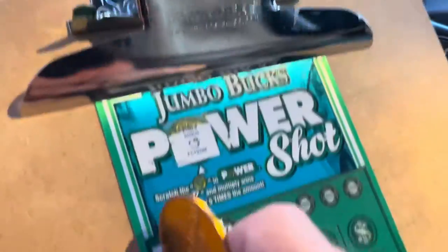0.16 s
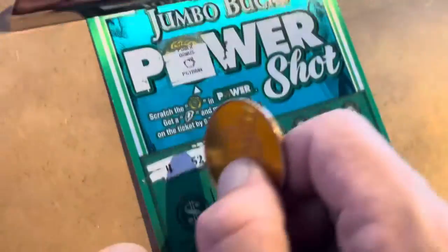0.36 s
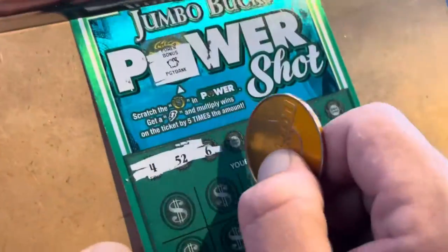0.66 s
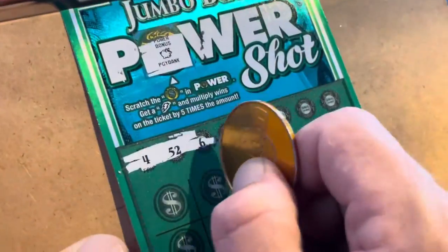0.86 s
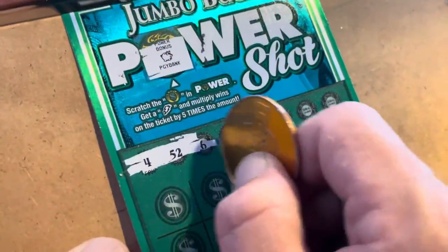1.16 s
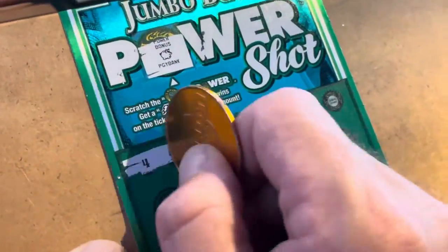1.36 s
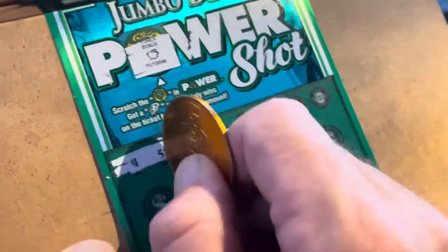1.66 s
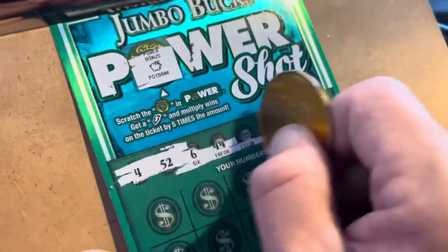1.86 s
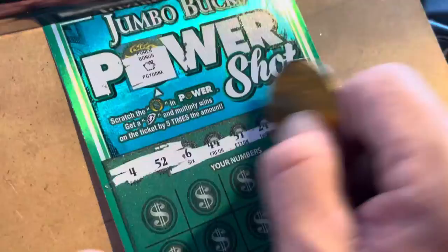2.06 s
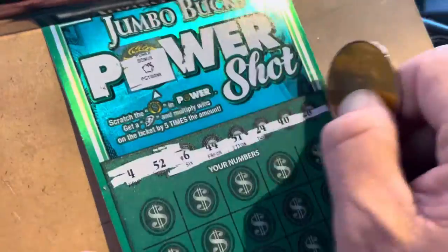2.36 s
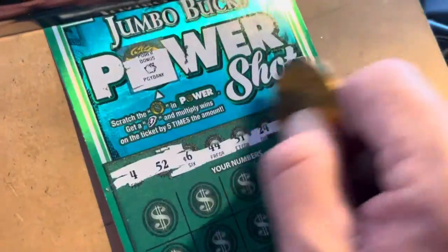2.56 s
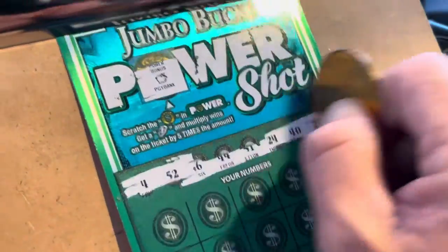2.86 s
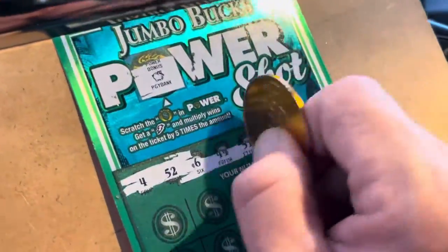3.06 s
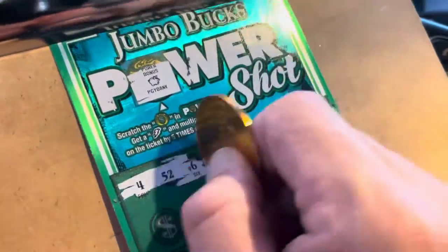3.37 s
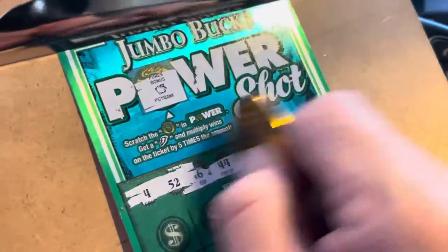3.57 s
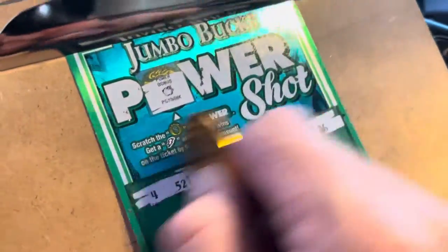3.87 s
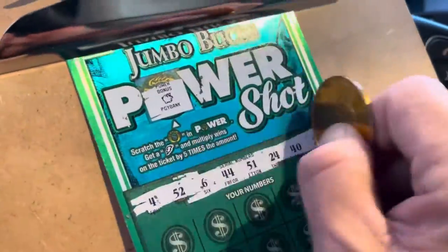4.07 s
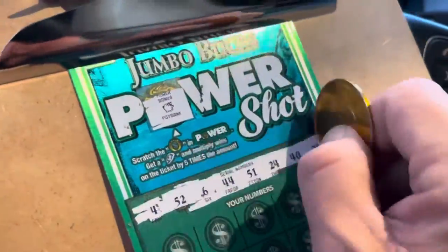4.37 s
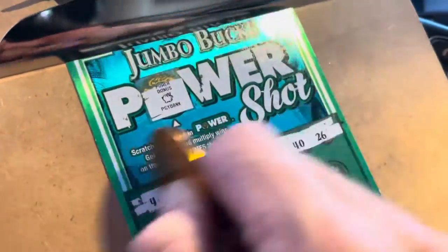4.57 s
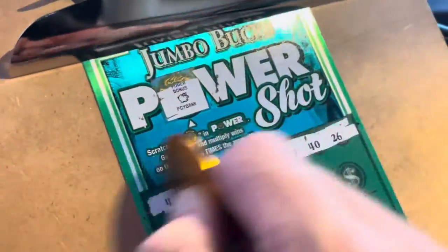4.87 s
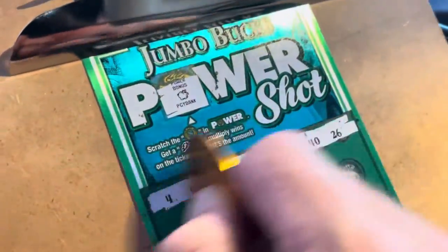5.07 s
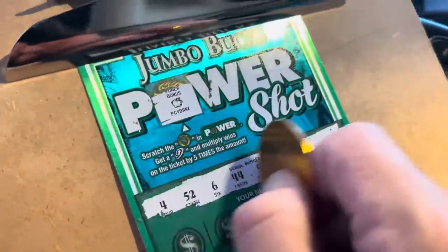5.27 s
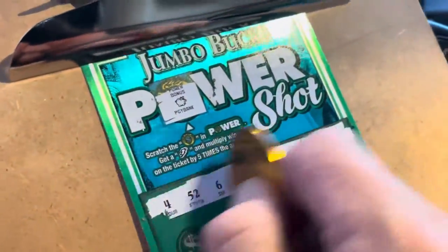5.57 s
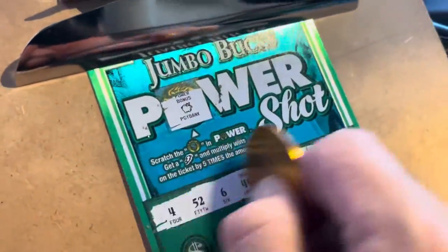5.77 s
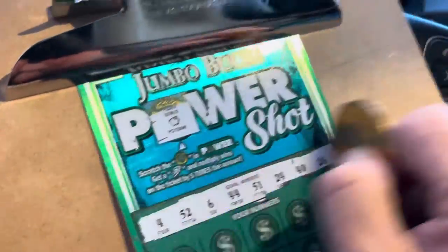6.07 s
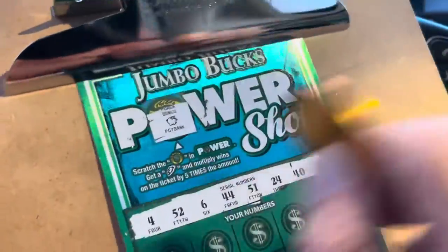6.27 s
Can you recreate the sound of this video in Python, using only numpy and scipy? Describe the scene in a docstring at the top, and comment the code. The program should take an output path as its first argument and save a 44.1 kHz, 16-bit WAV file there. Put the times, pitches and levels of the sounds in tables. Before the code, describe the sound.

Inside a parked, idling car, a low boomy rumble runs throughout. A hand rubs faintly on a clipboard with a few soft ticks, then from just over a second a coin scrapes a scratch card in quick alternating strokes, each a dry rasp with crisp tearing hiss. Occasional knocks ring the board. The scraping stops near the end with small taps. Close microphone, slight stereo width.

```python
"""Coin on a scratch card, parked car

Phone held close: a coin edge scrapes back and forth over a scratch card on a fibreboard clipboard.
Each stroke is a run of tiny catches that ring the board; where the edge bites, the coating tears with a hiss.
The coin knocks on ridges as short blows to the board's modes; the hand rustles as faint noise before and after.
Behind it the idling car booms in the cabin: steady low tones over coloured rumble."""
import sys
import numpy as np
from scipy import signal
from scipy.fft import rfft, irfft
from scipy.io import wavfile
from scipy.ndimage import uniform_filter1d

SR = 44100
rng = np.random.default_rng(int(sys.argv[2]) if len(sys.argv) > 2 else 0)


def persist_wave(psi):
    """Save psi, clipped to +-1, as 16-bit WAV."""
    counts = np.round(np.clip(psi, -1, 1) * 32767).astype(np.int16)
    wavfile.write(sys.argv[1], SR, np.atleast_2d(counts).T)


N = 283122
T = np.arange(N) / SR

# Cabin rumble spectrum: pitch_hz [Hz], density_db [dB per Hz, relative]
CABIN_SPECTRUM = [(30, -16.5), (45, -6), (75, -8), (112, -1), (130, -5), (160, -14.5), (260, -20),
                  (350, -27), (440, -22), (830, -43), (3100, -54), (4800, -73.5)]
CABIN_DB = -34  # rms of the rumble before its one swell, without the side part
# Cabin width: pitch_hz [Hz], side_minus_mid_db [dB]
CABIN_WIDTH = [(60, -13), (130, -18), (380, -4), (1300, -3), (2400, -14), (4400, -25)]
# Idle firing tones: multiple [of IDLE_HZ], level_db [dB rms]
IDLE_TONES = [(1, -49), (2, -43.5), (4, -43)]
IDLE_HZ = 27.97
# The low rumble swells once: peak_s [s], half_width_s [s], swell_db [dB]
RUMBLE_SWELL = (0.38, 0.25, 9)
HUM_HZ, HUM_DB = 311.3, -52.5  # thin hum of steady pitch, left only

# The hand rubs the board: time_s [s], level_db [dB]
HAND_RUB = [(.045, -51.5), (.075, -45), (.12, -43), (.165, -54), (.27, -52.5), (.33, -67)]
# Skin and card rustle as the hand shifts: peak_s [s], level_db [dB], half_length_s [s],
# treble_db [dB over the rest]
HAND_SHIFTS = [(0.102, -67, 0.045, 8), (0.356, -68.5, 0.24, 3.2), (0.51, -60.5, 0.039, -29),
               (0.666, -69, 0.042, -3), (0.796, -71.5, 0.044, 7), (1.171, -56.5, 0.041, -13),
               (1.244, -70.5, 0.069, 11), (6.395, -53, 0.043, 3)]
SHIFT_FADE_DB, STILL_DB = 16, -77.5  # lost at the half length; the hand at rest
# The edge resting on the card at the turns: first_db, last_db [dB at the first stroke and at the lift]
RESTING_EDGE_DB = (-70, -63.5)

# Knocks on the board: time_s [s], board_db [dB, relative], thud_db [dB]
RIDGE_KNOCKS = [(0.186, -30.5, -53), (0.353, -50, -25), (1.903, -18, -27.5), (2.774, -25, -25),
                (3.281, -18.5, -21), (3.852, -15, -47.5), (4.137, -16, -36), (4.165, -33, -25),
                (6.0869, -5, -26), (6.158, -32, -28), (6.351, -31.5, -28.5), (6.391, -33.5, -50.5)]
# Light ticks of coin and card: time_s [s], level_db [dB, relative]
LIGHT_TICKS = [(0.143, -42), (0.183, -38), (0.815, -47.5), (.887, -54), (1.014, -55), (1.112, -54),
               (1.276, -38.5), (2.009, -34), (3.534, -33.5), (4.2758, -19), (4.295, -18), (6.157, -33),
               (6.349, -27)]
# Ringing modes of the clipboard: pitch_hz [Hz], width_hz [Hz], level_db [dB, relative]
BOARD_MODES = [(582, 120, -8), (750, 113, -2.5), (1098, 317, 1.5), (1255, 135, 0.5), (1396, 113, -6.5),
               (2234, 200, -11.5), (2770, 550, -17)]
# Low modes behind the thuds: pitch_hz [Hz], width_hz [Hz], level_db [dB, relative]
THUD_MODES = [(249.5, 77, 1), (330, 250, -2.5)]

# Strokes: start_s [s], board_db [dB], swell_db [dB over the stroke], grit_db [dB]
COIN_STROKES = [(1.375, -30.5, 18, -40.5), (1.544, -32, 2, -42.5), (1.682, -31.5, 14, -36.5),
                (1.851, -38.5, -17, -48), (1.989, -32.5, 18, -47.5), (2.162, -31, -1, -51.5),
                (2.277, -36, -5, -44), (2.42, -31.5, 4, -48.5), (2.542, -34.5, -2, -36.5),
                (2.664, -33, 27, -55), (2.795, -38, 2, -42), (2.939, -34, 17, -43),
                (3.075, -36.5, -16, -48), (3.207, -34, 1, -47.5), (3.357, -34, 1, -59),
                (3.514, -29, -0.5, -53), (3.65, -34.5, 0.5, -41), (3.786, -33, -2, -59.5),
                (3.936, -28.5, 8, -42), (4.083, -36, -16.5, -41.5), (4.241, -29, 3, -50.5),
                (4.386, -36.5, 6, -37), (4.555, -32.5, 2.5, -45.5), (4.712, -29, 4.5, -56.5),
                (4.851, -31.5, 2.5, -49), (4.997, -35, -8, -56), (5.132, -33.5, 4, -45),
                (5.264, -34.5, -5, -48), (5.41, -33.5, 9, -47), (5.545, -31, 2, -55),
                (5.673, -34.5, 8, -50.5), (5.825, -33, -9.5, -51), (5.948, -27, 14.5, -53.5)]
TURN_S, LIFT_S = 0.014, 6.15  # pause at each turn; the coin leaves the card
LOOSE_S, SLOWING_SHARE = 0.015, 0.49  # breaking loose; share of the stroke spent slowing
BOARD_POWER, GRIT_POWER = 1.8, 2.4  # how sharply board and grit fall as the coin slows
# Low board modes ring less as the coin works along: first_db, last_db [dB at the first stroke and the lift]
LOW_MODES_TREND_DB = (1.3, -2.5)

# The edge bites into the coating: start_s [s], length_s [s], peak_db [dB],
# swell_db [dB climbed from the catch to the peak]
EDGE_BITES = [(1.396, 0.1, -38.5, 22.5), (1.567, 0.066, -44.5, 14), (1.699, 0.092, -34.5, 10.5),
              (1.877, 0.037, -42, 6), (2.035, 0.079, -31.5, 1.5), (2.178, 0.068, -36.5, 11),
              (2.334, 0.032, -33, -2), (2.541, 0.085, -36.5, 9), (2.721, 0.057, -36.5, 18),
              (2.805, 0.082, -31, 17.5), (2.97, 0.071, -39, 14), (3.075, 0.017, -32.5, 16.5),
              (3.132, 0.04, -34, 10.5), (3.275, 0.035, -44, 10), (3.364, 0.07, -30, 15.5),
              (3.571, 0.04, -34, 13), (3.668, 0.057, -29, 5.5), (3.818, 0.064, -34.5, 12),
              (3.967, .011, -33, 1.5), (4.108, 0.059, -32.5, 2.5), (4.262, .085, -37, 14),
              (4.417, 0.048, -33.5, 3), (4.6, 0.029, -30.5, 11), (4.753, 0.078, -41.5, 10),
              (5.034, 0.071, -38.5, 12), (5.141, 0.051, -36, 5), (5.208, 0.039, -32.5, 1),
              (5.291, 0.024, -33, 1.5), (5.339, .04, -36.5, -1.5), (5.42, 0.046, -37, 14),
              (5.61, 0.037, -34.5, 17), (5.678, 0.022, -33, 7), (5.895, 0.025, -38, 8),
              (5.988, 0.11, -41, 13), (6.074, 0.056, -31.5, 6)]
CATCH_S, BITE_PEAK_SHARE = 0.00095, 0.6  # onset ramp; share of the length before the peak
BITE_FADE_DB, BITE_FADE_POWER = 12.5, 2.13  # lost from the peak to the end of the length; curve
# Fresh coating tears bright, the bared card duller: time_s [s], treble_db [dB over the tearing hiss]
COATING_TREBLE = [(1.4, 3), (1.75, 4), (3.7, 1), (4.5, -1), (6.1, -6)]
# The finest flakes fly first: band edge, lift at the catch, extra loss over one bite length
FIZZ_HZ, FIZZ_DB, FIZZ_FADE_DB = 8400, 4, 6.5
# Tearing hiss, coarse flakes: pitch_hz [Hz], density_db [dB per Hz, relative]
TEAR_SPECTRUM = [(600, -28.5), (1000, 4), (1800, -5.5), (2500, 2), (3700, -2), (5200, -23)]
# Treble of the tearing, fine flakes: pitch_hz [Hz], density_db [dB per Hz, relative]
AIR_SPECTRUM = [(3000, -20), (4600, 0), (5500, -2), (9200, -8), (11000, -13), (12300, -15), (13600, -11),
                (15600, -9)]

# Part of the near sounds opposite in left and right: pitch_hz [Hz], level_db [dB]
NEAR_WIDTH = [(300, -18), (1250, -14), (1750, -3.5), (2300, -18), (4000, -74)]
# Stereo phase of the treble: pitch_hz [Hz], left_minus_right_phase_rad [rad]
STEREO_PHASE = [(5700, 0), (6900, -1), (7850, -np.pi), (8700, -np.pi), (10800, -2 * np.pi),
                (12200, -2 * np.pi), (14200, -3 * np.pi)]
# Balance of the near sounds: pitch_hz [Hz], left_minus_right_db [dB]
NEAR_BALANCE = [(100, -0.5), (600, 2), (1500, 0.5)]
TOP_HZ = 15900
LEFT_RIGHT = np.array([[1], [-1]])  # signs of a difference between left and right


def undb(db):
    """Decibels to amplitude."""
    return 10 ** (np.asarray(db) / 20)


def unit(x):
    """Scales to an rms of 1."""
    return x / np.sqrt(np.mean(x ** 2))


def over_time(table):
    """A (time, value) table at every sample."""
    return np.interp(T, *np.transpose(table))


def over_hz(table, size, ends=None):
    """A (Hz, value) table on the bins of a transform, interpolated over log frequency."""
    hz, value = np.transpose(table)
    bins = np.arange(size // 2 + 1) * SR / size
    return np.interp(np.log(bins + 1), np.log(hz + 1), value, left=ends)


def colour(x, table):
    """Causal minimum-phase filter with the given spectrum, from the folded cepstrum."""
    size = 8192
    ceps = irfft(np.log(undb(over_hz(table, size, ends=-60))))
    ceps[1:size // 2] *= 2
    ceps[size // 2 + 1:] = 0
    return signal.fftconvolve(x, irfft(np.exp(rfft(ceps))))[:N]


def ring(x, modes, sign=-1, first=0, count=None):
    """Damped modes struck by x; each next mode starts scaled by sign (-1: neighbours swing opposite)."""
    t = T[:SR // 10]
    each = []
    for k, (hz, width, db) in enumerate(modes):
        decay = np.exp(-np.pi * width * t)
        each.append(sign ** k * undb(db) * np.sqrt(width) * decay * np.sin(2 * np.pi * hz * t))
    peak = np.abs(sum(each)).max()  # of all modes, whichever are played
    return signal.fftconvolve(x, sum(each[first:count]) / peak)[:N]


def grains(per_s, spread_db):
    """Random catches, a few much stronger than the rest."""
    hit = rng.random(N) < per_s / SR
    boost_db = spread_db * np.minimum(rng.exponential(size=N), 4.5)
    return hit * rng.standard_normal(N) * undb(boost_db)


def walk(rate):
    """Random levels held 1 / rate s and slewed; rms 1."""
    hold = int(SR / rate)
    steps = np.repeat(rng.standard_normal(N // hold + 1), hold)
    return unit(uniform_filter1d(steps, hold)[:N])


def scatter(x, t60_s, wet_db):
    """Adds many small modes of card and clip as decaying noise; the set drifts with the contact. Keeps the rms."""
    t = T[:SR // 16]
    share = np.abs([walk(12) for _ in range(12)]) ** 2 + 0.024
    share /= np.sqrt(np.sum(share ** 2, axis=0))
    wet = 0
    for weight in share:
        tail = rng.standard_normal(len(t)) * 1000 ** (-t / t60_s)
        wet = wet + signal.oaconvolve(x * weight, tail)[:N]
    return unit(unit(x) + undb(wet_db) * unit(wet)) * np.sqrt(np.mean(x ** 2))


def cabin():
    """Idle firing tones and a thin hum over rumble in the cabin's resonances, in stereo."""
    boom = colour(rng.standard_normal(N), CABIN_SPECTRUM)
    other = colour(rng.standard_normal(N), CABIN_SPECTRUM)
    side = irfft(rfft(other) * undb(over_hz(CABIN_WIDTH, N)), N)
    gain = undb(CABIN_DB) / np.sqrt(np.mean(boom ** 2))

    peak_s, half_width_s, swell_db = RUMBLE_SWELL
    low = signal.sosfilt(signal.butter(2, 95, fs=SR, output="sos"), boom)
    swell = undb(swell_db * np.exp(-((T - peak_s) / half_width_s) ** 2))
    boom = boom + low * (swell - 1)

    idle = 0
    for k, db in IDLE_TONES:
        level = np.sqrt(2) * undb(db + 0.58 * (k - 1) * walk(3.14))  # higher multiples waver more
        idle = idle + level * np.sin(2 * np.pi * (k * IDLE_HZ * T + rng.random()))
    hum = np.sqrt(2) * undb(HUM_DB + 2.9 * walk(2.9)) * np.sin(2 * np.pi * HUM_HZ * T)
    left_only = np.array([[1], [0]])
    return hum * left_only + idle + gain * (boom + side * LEFT_RIGHT)


def rustle():
    """Gains of the hand's friction on the board, of faint skin-and-card rustle and of its treble."""
    rub = undb(np.interp(T, *np.transpose(HAND_RUB), right=-120))
    first = COIN_STROKES[0][0]
    on_card = (T > first) * (T < LIFT_S)
    rest = undb(STILL_DB) + on_card * undb(np.interp(T, (first, LIFT_S), RESTING_EDGE_DB))
    shifts = np.array([undb(db - SHIFT_FADE_DB * ((T - peak_s) / half_s) ** 2)
                       for peak_s, db, half_s, _ in HAND_SHIFTS])
    treble = undb([row[-1] for row in HAND_SHIFTS])
    return rub, rest + shifts.sum(axis=0), rest + treble @ shifts


def knocks():
    """Each blow starts board and thud modes together; ticks are short cracks of decaying noise."""
    board, thud, tick = np.zeros((3, N))
    for s, db, thud_db in RIDGE_KNOCKS:
        i = int(s * SR)
        board[i], thud[i] = undb(db), undb(thud_db)
    for s, db in LIGHT_TICKS:
        tick[int(s * SR)] = undb(db)
    t = T[:SR // 20]
    crack = signal.fftconvolve(tick, rng.standard_normal(len(t)) * np.exp(-t / 0.0076))[:N]
    highs = undb(7.0) * ring(board, BOARD_MODES, sign=0.93, first=2)
    lows = undb(-8.0) * ring(board, BOARD_MODES, sign=1, count=2)
    struck = scatter(highs + lows, t60_s=0.077, wet_db=-0.5)
    ticks = undb(-4.5) * colour(crack, TEAR_SPECTRUM) + colour(crack, AIR_SPECTRUM)
    return struck + ring(thud, THUD_MODES) + ticks


def strokes():
    """Board and grit gains: the coin breaks loose quickly, crosses and slows to the turn."""
    board, grit = np.zeros(N), np.zeros(N)
    ends = [row[0] - TURN_S for row in COIN_STROKES[1:]] + [LIFT_S]
    for (start, db, swell_db, grit_db), end in zip(COIN_STROKES, ends):
        done = np.clip((T - start) / (end - start), 0, 1)
        loose = 1 - np.exp(-np.maximum(T - start, 0) / LOOSE_S)
        slowing = np.sin(np.pi / 2 * np.minimum((1 - done) / SLOWING_SHARE, 1))
        board += undb(db + swell_db * (done - .5)) * loose * slowing ** BOARD_POWER
        grit += undb(grit_db) * loose * slowing ** GRIT_POWER
    return board, grit


def bites():
    """Gains of the tearing hiss, of its treble and of the fizz on top: a sudden catch, a swell, a fade."""
    tear, fizz = np.zeros((2, N))
    for start, length, db, swell_db in EDGE_BITES:
        span = slice(int(start * SR), int((start + 3 * length) * SR))  # leaves room for the fade
        done = (T[span] - start) / length
        past_peak = done - BITE_PEAK_SHARE
        catch = np.clip(done * length / CATCH_S, 0, 1)
        climb_db = -swell_db * past_peak / BITE_PEAK_SHARE
        fade_db = BITE_FADE_DB * (np.abs(past_peak) / (1 - BITE_PEAK_SHARE)) ** BITE_FADE_POWER
        level_db = db - np.where(past_peak < 0, climb_db, fade_db)
        tear[span] += catch * undb(level_db)
        fizz[span] += catch * undb(level_db + FIZZ_DB - FIZZ_FADE_DB * done)
    treble = undb(over_time(COATING_TREBLE))
    return tear, tear * treble, fizz * treble


def scrape(board, tear, air, fizz):
    """Catches ring the board; torn coating crackles densely, in coarse and in fine flakes."""
    catches = grains(3000., 1.76)
    # low and high modes come and go with the place of contact
    trend_db = np.interp(T, (COIN_STROKES[0][0], LIFT_S), LOW_MODES_TREND_DB)
    lows = undb(trend_db + 2.2 * walk(7)) * ring(catches, BOARD_MODES, count=2)
    mids = ring(catches, BOARD_MODES, first=2, count=4)
    highs = undb(2.5 * walk(7)) * ring(catches, BOARD_MODES, first=4)
    drag = unit(lows + mids + highs) * undb(1.3 * walk(60))
    thud = unit(ring(grains(500., 3.9), THUD_MODES))

    flutter = undb(1.36 * walk(110))
    coarse, fine = grains(3500., 2.07) * flutter, grains(9000., 1.8) * flutter
    hiss = unit(colour(coarse, TEAR_SPECTRUM)) * undb(0.99 * walk(25))
    flakes = unit(colour(fine, AIR_SPECTRUM))
    finest = signal.sosfiltfilt(signal.butter(4, FIZZ_HZ, "high", fs=SR, output="sos"), flakes)
    torn = tear * hiss + air * (flakes - finest) + fizz * finest

    dragged = scatter(board * drag, t60_s=0.041, wet_db=-2.0) + undb(-14.0) * board * thud
    return dragged + scatter(torn, t60_s=0.046, wet_db=-1.5)


def scene():
    """Scrape and blows alike in left and right, widened by a second scrape texture plus the blows, opposite
    in left and right; the cabin lies behind."""
    rub, hush, hush_air = rustle()
    blows = knocks()
    board, grit = strokes()
    tear, air, fizz = bites()
    gains = board + rub, tear + grit + hush, air + undb(-2.0) * grit + hush_air, fizz + grit + hush_air
    near = scrape(*gains) + blows
    # left and right are least alike in the bands between the phase steps
    unlike = undb(over_hz(NEAR_WIDTH, N)) + .3 * np.sin(over_hz(STEREO_PHASE, N)) ** 2
    quarter_turn = np.exp(.5j * np.pi)
    side = irfft(rfft(scrape(*gains) + blows) * unlike * quarter_turn, N)
    balance = undb(over_hz(NEAR_BALANCE, N) / 2 * LEFT_RIGHT)
    both = rfft(near + side * LEFT_RIGHT) * balance
    return irfft(both, N) + cabin()


def record(dry):
    """Left and right differ in phase in the treble, in steps; the top is cut."""
    turn = np.exp(.5j * over_hz(STEREO_PHASE, N) * LEFT_RIGHT)
    turned = irfft(rfft(dry) * turn, N)
    return signal.sosfilt(signal.ellip(10, .2, 60, TOP_HZ, fs=SR, output="sos"), turned)


dry = scene()
out = record(dry)
persist_wave(out)
```